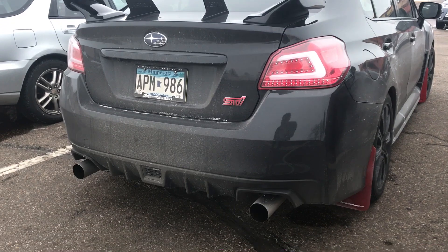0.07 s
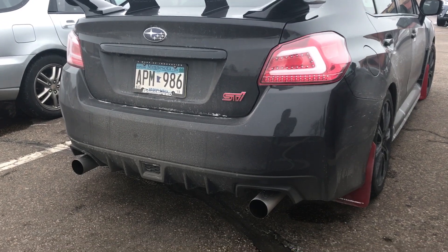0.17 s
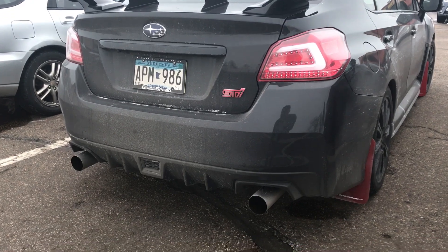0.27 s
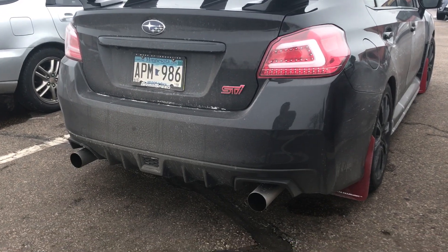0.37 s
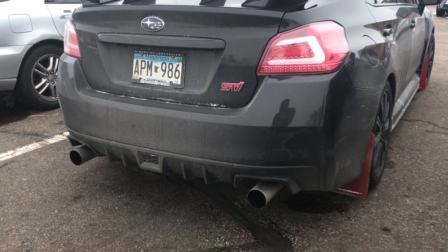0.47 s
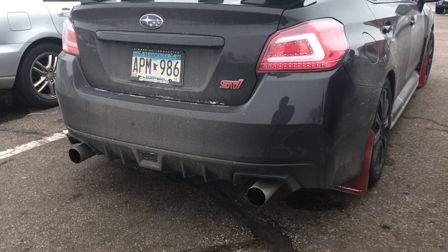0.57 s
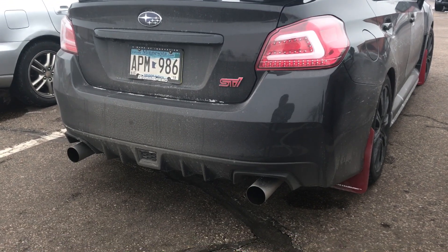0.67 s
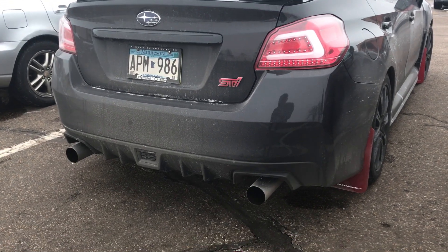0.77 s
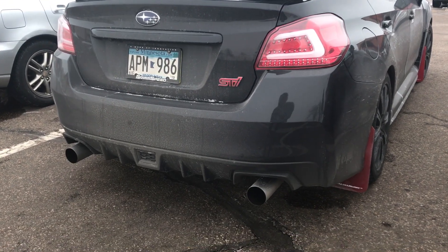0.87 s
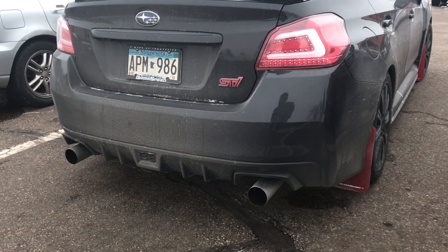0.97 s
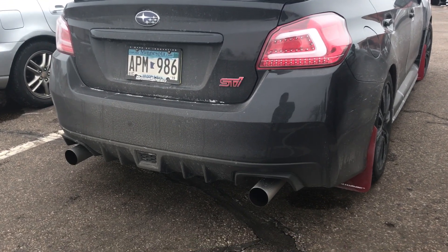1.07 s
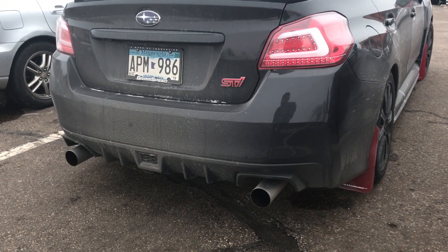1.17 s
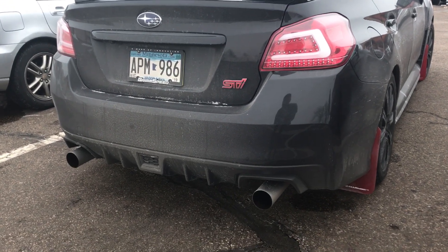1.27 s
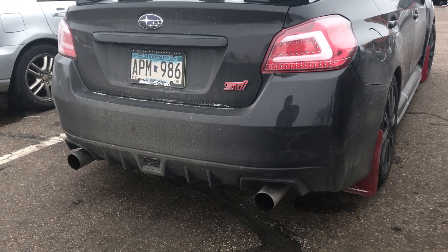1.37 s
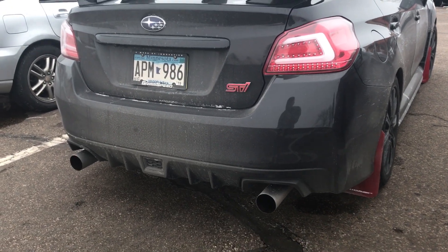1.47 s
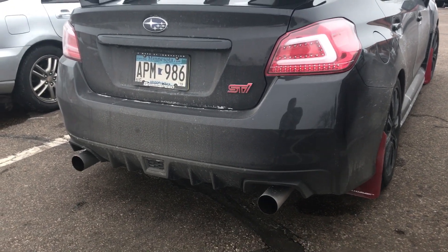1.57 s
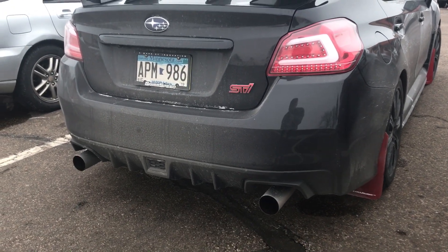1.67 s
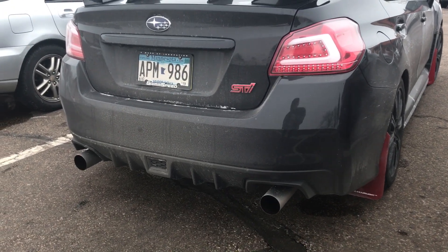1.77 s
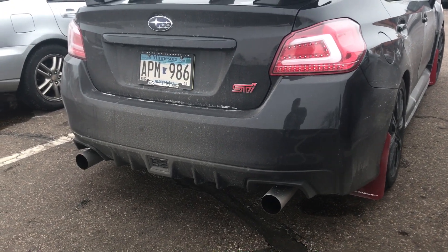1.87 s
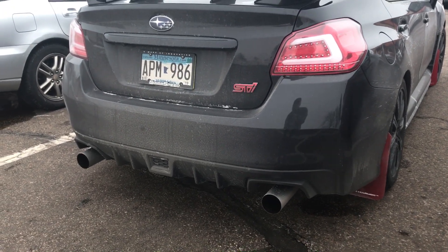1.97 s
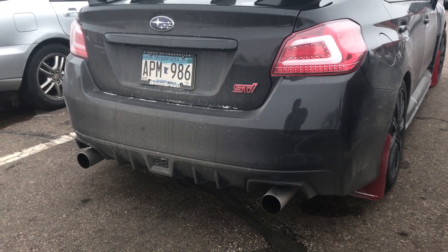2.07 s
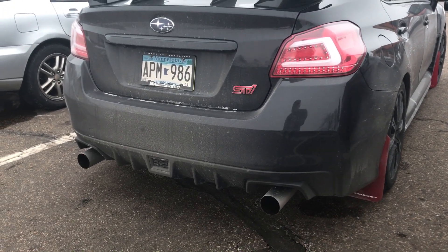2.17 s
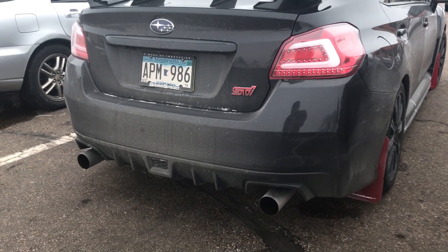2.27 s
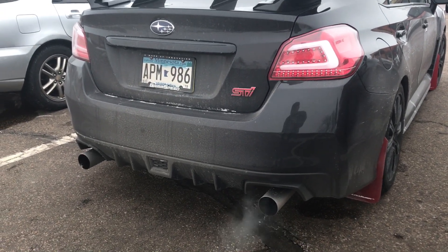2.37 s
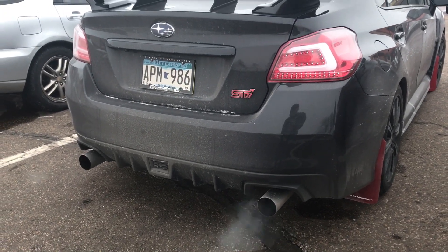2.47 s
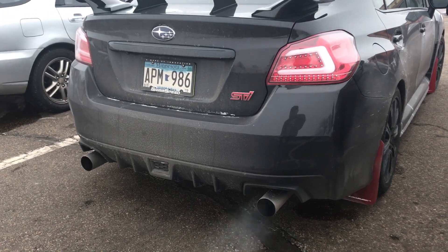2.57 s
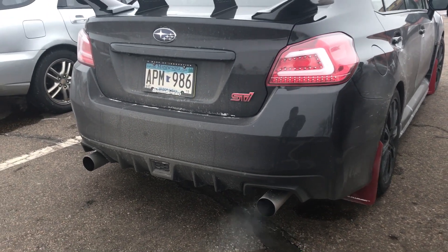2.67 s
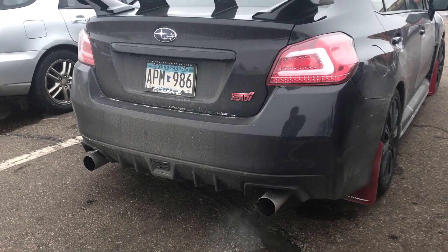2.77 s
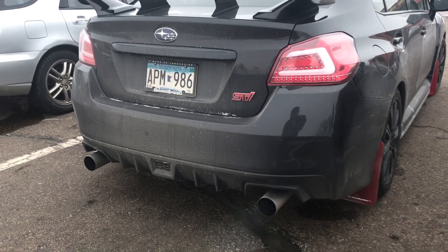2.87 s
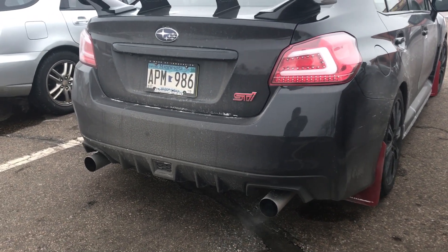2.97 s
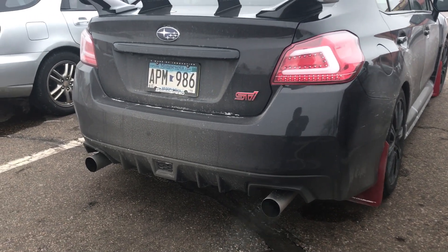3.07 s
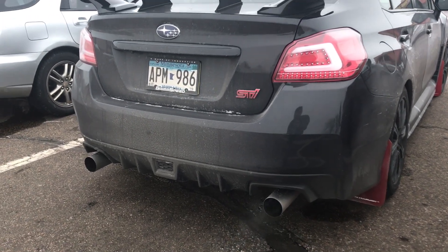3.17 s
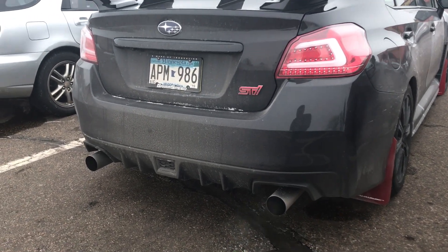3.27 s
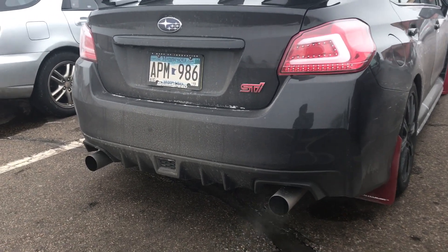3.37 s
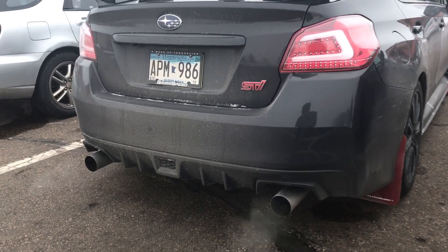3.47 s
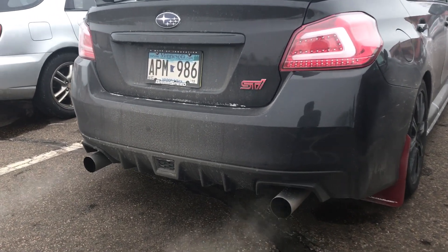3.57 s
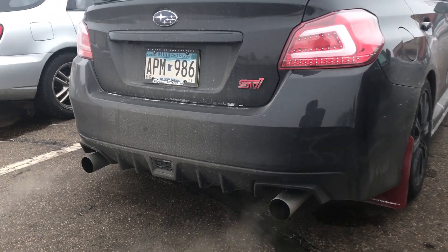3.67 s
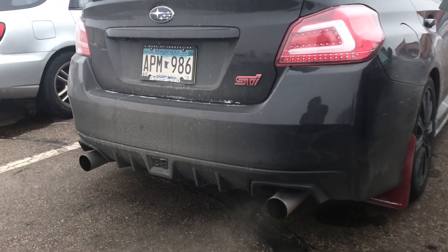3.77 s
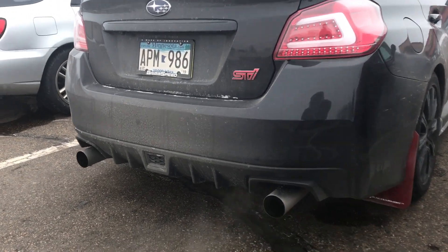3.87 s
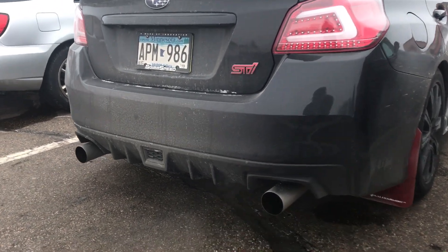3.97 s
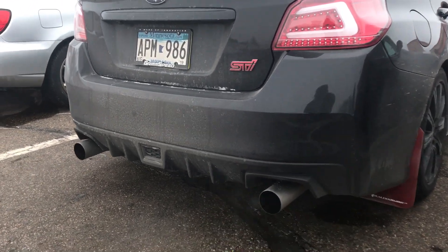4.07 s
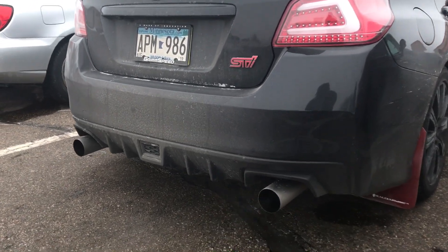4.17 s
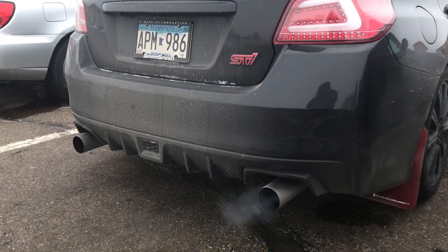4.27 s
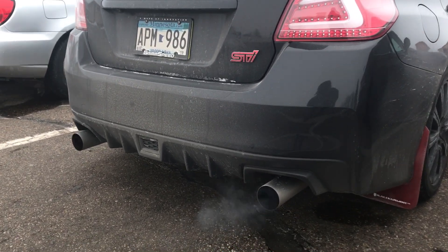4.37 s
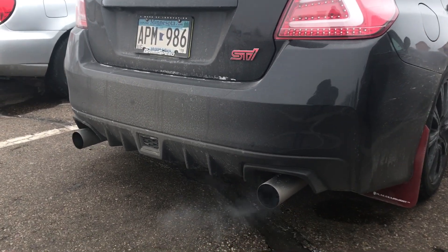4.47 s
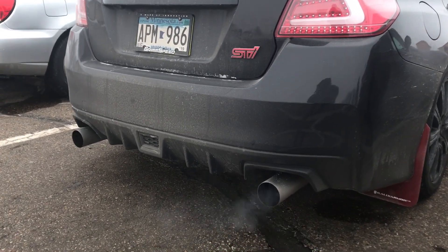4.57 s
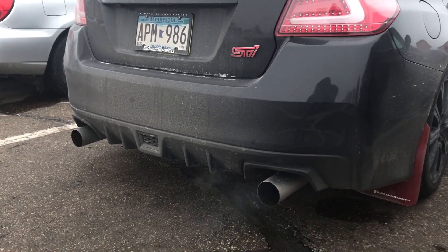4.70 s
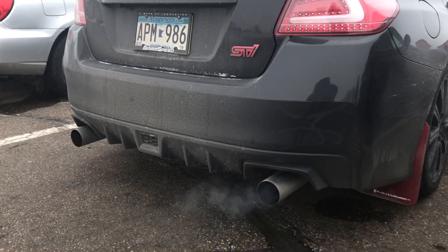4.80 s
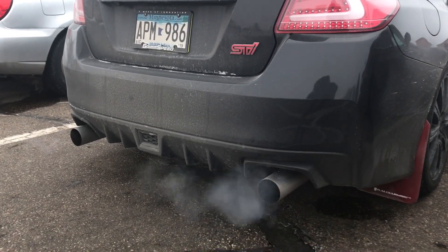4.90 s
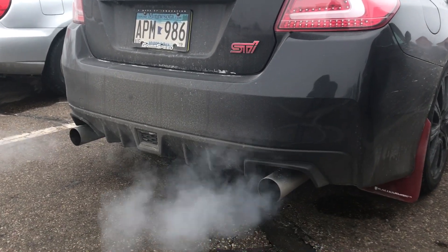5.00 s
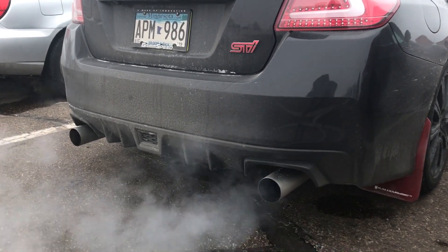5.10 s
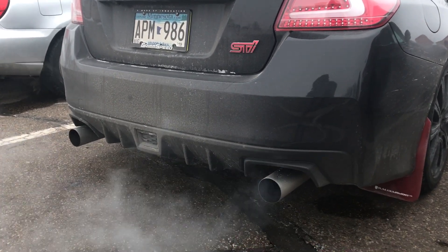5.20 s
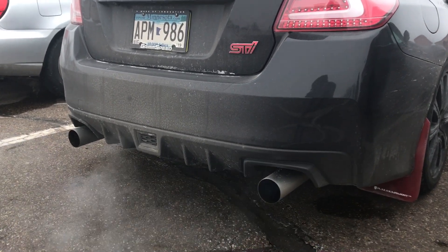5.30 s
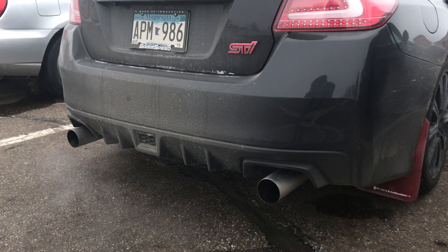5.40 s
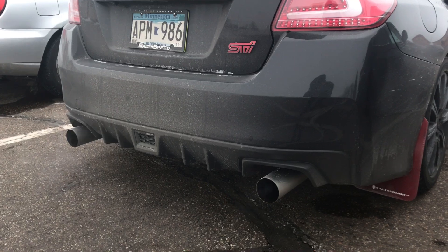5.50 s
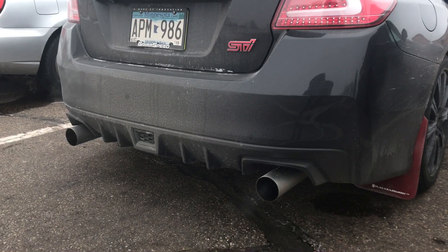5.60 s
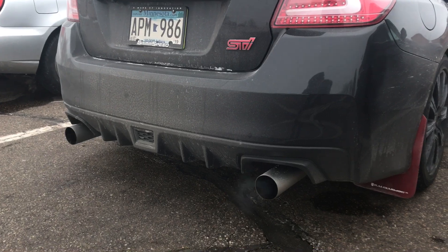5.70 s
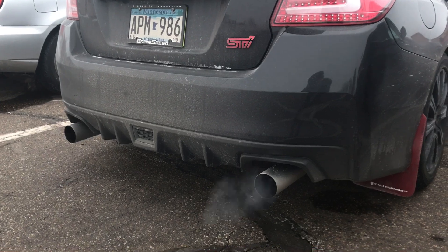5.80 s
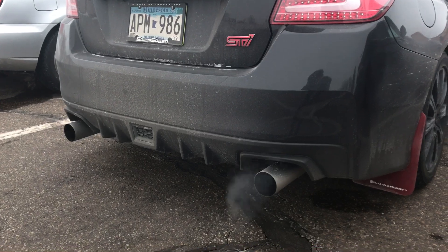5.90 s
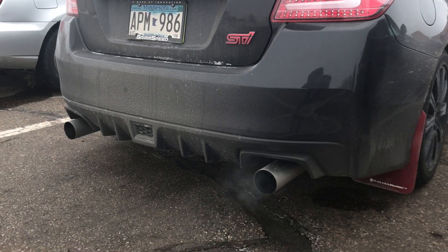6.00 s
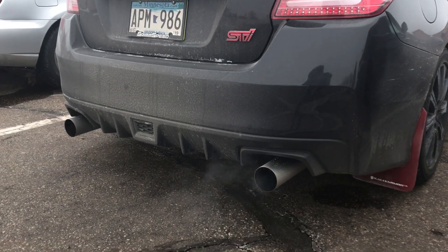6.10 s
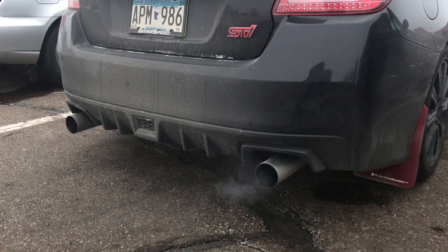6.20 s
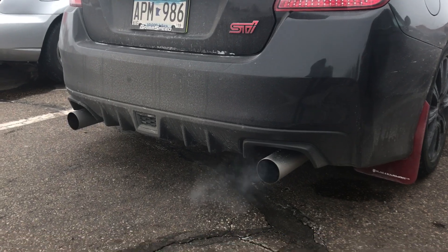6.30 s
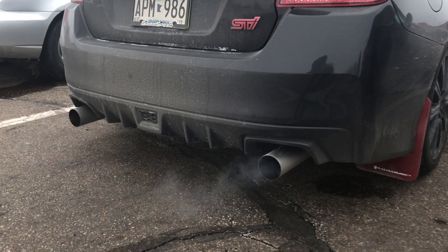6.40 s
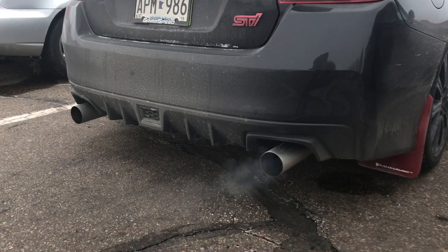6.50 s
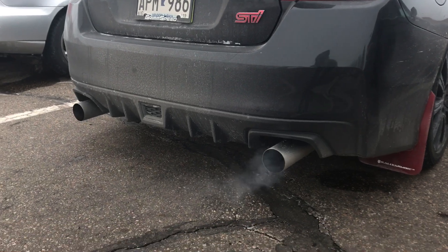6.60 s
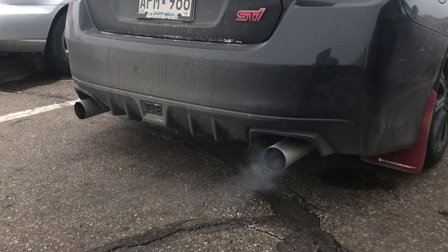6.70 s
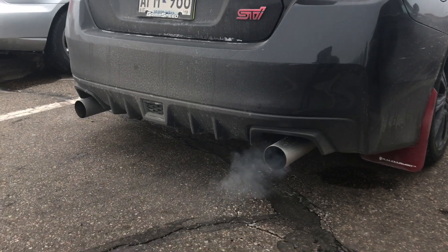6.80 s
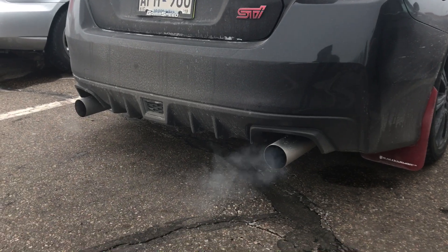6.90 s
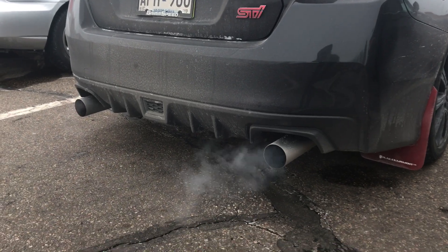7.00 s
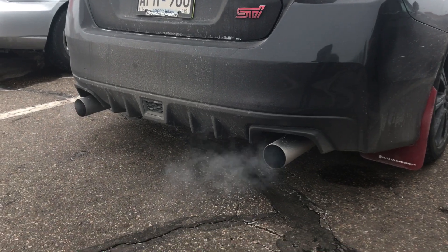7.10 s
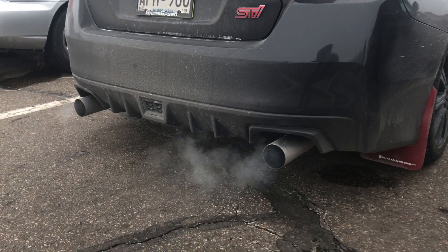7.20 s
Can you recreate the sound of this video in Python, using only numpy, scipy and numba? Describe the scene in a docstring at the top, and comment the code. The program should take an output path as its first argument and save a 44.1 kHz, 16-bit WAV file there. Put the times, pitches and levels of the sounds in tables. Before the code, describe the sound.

A phone held behind a parked car picks up its deep, off-beat four-cylinder exhaust. It idles briefly, then gets a soft rev, a stronger one, and two barking, rasping blips with popping in the pipe. The revs sag into burble after each, ending in a steady drone with small pops. Faint reflections from nearby cars, low outdoor rumble, light hiss and spits of air.

```python
"""A flat-four turbo car with an open exhaust idles and is blipped four times, two metres from a phone, outdoors.
Firing pulses ring the pipe; one bank's longer manifold delays and dulls its pair, so the note burbles.
Gas flow makes noise at the tips with each blip, and unburnt fuel pops in the pipe as bursts and blows.
Brief spits of air tick, electrics whine in thin tones, and parked cars reflect it over a low outdoor rumble."""
import sys
import numpy as np
from scipy import signal
from scipy.io import wavfile
from scipy.ndimage import uniform_filter1d
from numba import njit

SR = 44100
rng = np.random.default_rng(int(sys.argv[2]) if len(sys.argv) > 2 else 0)


def generate_wav(signal):
    """Clip the signal to [-1, 1] and save it as 16-bit WAV at the path in sys.argv[1]."""
    frames = np.transpose(np.atleast_2d(signal))
    scaled = np.clip(frames, -1, 1) * 32767
    pcm = np.round(scaled).astype(np.int16)
    wavfile.write(sys.argv[1], SR, pcm)


N = 319725
TIME = np.arange(N) / SR

# throttle blips: start_s, opening_s, closing_s, depth (0-1), burble_db (extra scatter after the blip)
BLIPS = [(.58, .09, .487, .386, 0), (2.169, .233, .443, .567, 2), (3.482, .179, .249, .897, 3),
         (4.924, .2, .228, 1, 3)]
# flywheel: gain in firing rate at full throttle, decay time of drag, resting and starting firing rates
PULL_HZ_PER_S, COAST_S, STALL_HZ, START_HZ = 278.2, 1.13, 22.48, 40.07
# extra throttle (0-1) at the early idle, and when it stops
IDLE_FEED, IDLE_FEED_ENDS_S = .0218, 2.0
# firing rates where the burble starts to fade in, is full, starts to fade out and is gone: rate_hz
BURBLE_HZ = [44, 48, 61, 66]
# scatter of firing strength: always, and added at full throttle
EVEN_DB, THROTTLE_SCATTER_DB = .8, .8
# mean firing strength of each cylinder, first and last on the long bank: strength_db (relative)
CYLINDER_DB = [1, -0.92, -0.46, 0.65]
# long manifold: delay, then a resonant low-pass and the share of sharp front that survives it
LONG_BANK_LAG_S = .0006
LONG_BANK_HZ, LONG_BANK_Q, LONG_BANK_LEAK = 132.4, 1.13, 0.35
# rush of exhaust gas in each blip: start_s, full_s, ease_s, end_s, strength (0-1)
RUSHES = [(0.644, 0.705, 0.79, 1.21, 0.43), (2.232, 2.384, 2.415, 2.675, 0.7),
          (3.466, 3.615, 3.67, 3.918, 0.8), (4.935, 5.05, 5.116, 5.36, 0.86)]
RUSH_BRIGHTENS = 0.28  # share by which rush strength 1 shifts the rasp to its near colour
# the phone sinks towards the near tip: time_s, nearness (0-1)
NEAR = [(0, 0.09), (2.6, 0.15), (3.6, 0.46), (4.6, 0.72), (6.4, 0.96), (7.25, 0.58)]
# level against firing rate, throttle shut: rate_hz, boom_db, bark_db, rasp_db, roar_db, hiss_db (relative)
COASTING = [(36, -16, -14, -20.5, -43, -60.5), (41.6, -20, -19, -22.5, -47, -59.5),
            (48.2, -17.5, -18.5, -26, -48, -59.5), (70, -16, -19, -26.5, -48, -59.5),
            (72.2, -18, -21.5, -24, -47.5, -59.5), (97, -25.5, -19.5, -26.5, -45.5, -58.5)]
# responses of boom, bark, rasp, roar, hiss in turn: lead_s, full_rush_db, curve_power, swell_db,
# burble_slope (dB per dB of extra scatter), near_db (at nearness 1)
RESPONSE = [(0, 5.5, 1.4, 4, -0.9, 0.5), (0.017, 12.5, 0.63, 6.5, -0.87, -0.5),
            (0.018, 19.5, 0.95, 8, -.5, -4), (0.0092, 23, 1, 5.5, 0, -1), (0.0073, 17, 1.74, 2, -1, -2)]
# brief swells of the note: centre_s, strength (0-1)
SWELLS = [(3.0, 0.13), (3.99, 0.74), (5.46, 1)]
SWELL_S = 0.12  # time from the centre to 1/e
# low and middle pipe resonances: centre_hz, width_hz (first pass), gain_db (relative)
BOOM = [(45.8, 26, 2.5), (67, 31.2, 7)]
BARK = [(104.6, 13.2, -0.88), (127.4, 12.7, -0.38), (147.2, 13.6, 1), (174.26, 23, 1)]
# upper pipe resonances heard far from and near the tip: centre_hz, width_hz (first pass), gain_db (relative)
RASP_FAR = [(227.5, 34.4, -5), (264, 31, 1), (297.7, 29, -0.5)]
RASP_NEAR = [(257.4, 15.3, -3.5), (297.8, 23, 6), (328.8, 36.6, -3.5), (376.2, 35, -7)]
# high pipe modes excited by flow, far and near: centre_hz, width_hz (first pass), gain_db (relative)
ROAR_FAR = [(499, 47, 0), (621, 58, -13.5), (849, 49, 3), (1060, 230, -10.5), (1422, 210, -11)]
ROAR_NEAR = [(490, 44.5, 0.5), (605, 47, -1.5), (820, 140, -8.5), (1122, 122, -10.5), (1320, 144, -8.5)]
# spectrum of the flow hiss: frequency_hz, density_db (relative, per Hz)
AIR = [(820, -31), (1400, 2), (1700, 0), (2340, -2), (3100, -3.5), (3720, -5.5), (4400, -7.5),
       (4930, -20.5), (5900, -11.5), (10200, -23), (12000, -33.5), (12300, -21), (15600, -20)]
HISS_FLICKER_DB = .7
# tones of the electrics: mean_hz, level_db (rms, before the common level below)
WHINE = [(11510, -75), (12360, -86), (12877, -88), (13410, -88), (15127, -87)]
# common level of those tones: time_s, change_db
WHINE_LEVEL = [(0, 7), (2.3, 4), (2.7, -1), (4.4, 2), (5.8, -13), (6.3, 4), (7.25, 4)]
# afterfire in the pipe: start_s, crack_db (before CRACK_DB is added), thump_db (relative)
POPS = [(0.372, -40, -32), (0.396, -43, -16), (0.506, -45, -27), (0.685, -46, -30), (2.261, -51, -12),
        (2.385, -28, -2), (2.424, -29, -10), (2.547, -30, -17), (2.602, -33, -24), (2.959, -52, -8),
        (3.02, -37, -10), (3.158, -38, -7.5), (3.584, -28, -3), (3.619, -18, -34), (3.649, -13, -1),
        (3.693, -25.5, -18), (4.374, -37, -13), (4.521, -30.5, -6.5), (5.018, -22, 1.5), (5.047, -21, -21),
        (5.114, -14.5, 2), (5.189, -44, -0.5), (5.362, -31, -7.5), (5.964, -35.5, -31), (6.118, -40, -20),
        (6.23, -36.5, -10.5), (6.259, -35, -17), (6.321, -37, -18), (6.351, -31.5, -32),
        (6.366, -31.5, -13.5)]
CRACK_S, CRACK_DB = 0.0037, -4  # time to the burst's peak, level added to every crack
# spits of air: start_s, strength_db (relative)
TICKS = [(2.938, -58.5), (2.9989, -46), (3.0627, -40), (3.1296, -39.5), (3.198, -38), (3.2693, -39),
         (3.3406, -43.5), (3.4509, -45), (4.2256, -46), (4.5055, -47), (5.0203, -37), (5.9876, -48),
         (6.0726, -43), (6.1462, -40)]
TOP_HZ = 15720  # upper band edge of the phone


def undb(db):
    """Amplitude gain is ten to the power of decibels over twenty."""
    return 10 ** (np.asarray(db) / 20)


def level(x, db):
    """Normalisation by the root mean square sets the effective level."""
    return x * undb(db) / np.sqrt(np.mean(x ** 2))


def curves(table):
    """Linear interpolation joins table columns in time."""
    s, *columns = np.transpose(table)
    return [np.interp(TIME, s, c) for c in columns]


@njit
def svf(x, hz, width):
    """Two coupled integrators form a band-pass resonator with unit gain at its centre."""
    y, band, low = np.empty(len(x)), 0., 0.
    g, damping = np.tan(np.pi * hz / SR), width / hz
    for i in range(len(x)):
        v = (band + g * (x[i] - low)) / (1 + g * (g + damping))
        band, low, y[i] = 2 * v - band, low + 2 * g * v, damping * v
    return y


def ring(x, modes, skirt=1.8):
    """Modal superposition: resonances of alternating sign, steepened by a second pass of scaled width."""
    total = 0
    for k, (hz, width, db) in enumerate(modes):
        first = svf(x, 1. * hz, 1. * width)
        total = total + (-1) ** k * undb(db) * svf(first, 1. * hz, skirt * width)
    return total


def walk(rate):
    """Held random values, averaged twice, give a slow fluctuation of spread near 1."""
    k = int(SR / rate)
    held = np.repeat(rng.standard_normal(N // k + 1), k)
    return 1.3 * uniform_filter1d(uniform_filter1d(held, k), k)[:N]


def impulses(seconds, size):
    """An ideal impulse concentrates each event in one sample."""
    return np.bincount(np.clip(seconds * SR, 0, N - 1).astype(int), size, N)


def coloured(points, flicker_db):
    """Band synthesis: independently flickering bands of noise follow a power spectrum."""
    hz, db = np.transpose(points)
    centres = np.geomspace(hz[1], hz[-2], num=18)
    # bandwidth grows with frequency, so density per Hz is converted to band level
    gains = np.interp(np.log(centres), np.log(hz), db) + 10 * np.log10(centres / 2000)
    total = 0
    for f, gain in zip(centres, gains):
        band = svf(svf(rng.standard_normal(N), f, f / 5), f, f / 5)
        total = total + undb(gain + flicker_db * walk(15)) * band
    return total


def throttle():
    """Piecewise-linear control: each blip opens and closes in straight ramps."""
    return sum(depth * np.interp(TIME, [s, s + up, s + up + down], [0, 1, 0])
               for s, up, down, depth, _ in BLIPS)


def speed():
    """Flywheel dynamics: throttle torque raises the firing rate and drag relaxes it exponentially."""
    pull = PULL_HZ_PER_S * (throttle() + IDLE_FEED * (TIME < IDLE_FEED_ENDS_S))
    coast = STALL_HZ + (START_HZ - STALL_HZ) * np.exp(-TIME / COAST_S)
    return coast + signal.lfilter([1 / SR], [1, 1 / (SR * COAST_S) - 1], pull)


def burble(hz):
    """Irregular combustion: burns scatter more, in dB, while coasting through a band of speeds."""
    s, *_, db = np.transpose(BLIPS)
    latest = np.clip(np.searchsorted(s, TIME) - 1, 0, None)
    shut = uniform_filter1d(1. * (throttle() == 0), size=2048)
    return db[latest] * shut * np.interp(hz, BURBLE_HZ, [0, 1, 1, 0])


def rush(lead_s):
    """Gas flow in each blip follows a ramp up, a hold and a ramp down, advanced by lead_s."""
    return sum(a * np.interp(TIME + lead_s, times, [0, 1, 1, 0]) for *times, a in RUSHES)


def loudness(hz, burble_db):
    """Decibel gains add: boom, bark, rasp, roar and hiss follow speed, flow, swells, burble and nearness."""
    near, = curves(NEAR)
    swell = sum(a * np.exp(-((TIME - s) / SWELL_S) ** 2) for s, a in SWELLS)
    rate, *shut_db = np.transpose(COASTING)
    levels = []
    for db, (lead_s, full_db, power, swell_db, slope, near_db) in zip(shut_db, RESPONSE):
        flow_db = np.interp(hz, rate, db) + full_db * rush(lead_s) ** power
        levels.append(flow_db + swell_db * swell + slope * burble_db + near_db * near)
    return levels


def firings(hz, uneven_db):
    """Phase accumulation times pressure pulses, two per bank in turn, each followed by a decaying gas puff."""
    turns = np.cumsum(hz) / SR - .9
    index = np.arange(-1, int(turns[-1]) + 1)
    chance = rng.standard_normal((1000, 2))[:len(index)].T
    at = np.interp(index, turns, TIME)
    scatter_db = np.interp(at, TIME, uneven_db)
    at = at + .0001 * scatter_db * chance[0]  # uneven burns also come early or late
    size = undb(np.take(CYLINDER_DB, index % 4) + scatter_db * chance[1])
    far = (index + 1) % 4 < 2
    short = impulses(at[~far], size[~far])
    late = impulses(at[far] + LONG_BANK_LAG_S, size[far])
    # the crossover pipe is a resonant low-pass on its two cylinders; a little of the sharp front survives
    w = 2 * np.pi * LONG_BANK_HZ
    dull = signal.lfilter(*signal.bilinear([w * w], [1, w / LONG_BANK_Q, w * w], SR), late)
    puff = np.convolve(short + 0.71 * late, np.exp(-TIME[:1024] / 0.013))[:N]
    return short + dull + LONG_BANK_LEAK * (late - dull), puff


def exhaust(pulses, boom_db, bark_db, rasp_db):
    """Forced resonance: firings, roughened by turbulence, ring the low, middle and upper pipe modes."""
    near = np.clip(curves(NEAR)[0] + RUSH_BRIGHTENS * rush(0), 0, 1)
    drive = level(pulses, 0) + level(rng.standard_normal(N), -18)
    rasp_far = level(ring(drive, RASP_FAR, skirt=0.72), 0)
    rasp_near = level(ring(drive, RASP_NEAR, skirt=0.89), 0)
    rasp = (1 - near) * rasp_far + near * rasp_near
    boom = level(ring(drive, BOOM), 0)
    bark = level(ring(drive, BARK), 0)
    return undb(boom_db) * boom + undb(bark_db) * bark + undb(rasp_db) * rasp


def gas(puff, roar_db, hiss_db):
    """Turbulent flow, modulated by puffs, excites high pipe modes and radiates a broad hiss and a bright jet."""
    near, = curves(NEAR)
    flow = (0.27 + puff) * rng.standard_normal(N)
    roar = (1 - near) * ring(flow, ROAR_FAR, skirt=7.8) + near * ring(flow, ROAR_NEAR, skirt=7.2)
    roar = roar * undb(0.3 * walk(15))
    hiss = (1.7 + puff) * coloured(AIR, flicker_db=HISS_FLICKER_DB) * undb(0.74 * walk(18))
    jet = (.8 + puff) * svf(rng.standard_normal(N), 13500., 7000.)
    jet_db = -63.5 + 1.4 * (hiss_db + 57)  # the jet grows faster than the hiss when the throttle opens
    return undb(roar_db) * level(roar, -0.74) + undb(hiss_db) * level(hiss, 6.3) + undb(jet_db) * level(jet, 0)


def whine():
    """Slow random frequency and amplitude modulation makes the electrics' thin sinusoids unsteady."""
    db_now, = curves(WHINE_LEVEL)
    waver_db = 1.5
    total = 0
    for hz, db in WHINE:
        gain = np.sqrt(2) * undb(db + db_now + waver_db * walk(1.4))
        phase = 2 * np.pi * np.cumsum(hz + 14 * walk(30)) / SR
        total = total + gain * np.sin(phase)
    return total


def rumble():
    """Band-limited noise forms the low outdoor rumble."""
    return level(svf(rng.standard_normal(N), 25., 67.0), -43)


def afterfire():
    """Impulsive excitation: each pop is a rough noise burst and a blow that rings the pipe."""
    s, crack_db, thump_db = np.transpose(POPS)
    near, = curves(NEAR)
    modes = [(hz, 2 * w, db) for hz, w, db in ROAR_NEAR] + [(2560, 1200, -29.0)]
    noise = rng.standard_normal(N)
    shape = TIME[:4096] / CRACK_S * np.exp(1 - TIME[:4096] / CRACK_S)
    bursts = signal.fftconvolve(impulses(s, undb(crack_db)), shape)[:N]
    cracks = ring(bursts * noise, modes) * undb(CRACK_DB) / ring(noise, modes).std()
    blows = [ring(np.eye(1, 4096)[0], rasp + BARK[2:]) for rasp in (RASP_FAR, RASP_NEAR)]
    thumps = [signal.fftconvolve(impulses(s, undb(thump_db)), blow / blow.max())[:N] for blow in blows]
    return cracks + (1 - near) * thumps[0] + near * thumps[1]


def ticks():
    """Amplitude modulation of bright noise by millisecond envelopes makes the spits of air."""
    s, db = np.transpose(TICKS)
    shape = TIME[:1024] / 0.0098 * np.exp(1 - TIME[:1024] / 0.0021)
    envelope = np.convolve(impulses(s, undb(db)), shape)[:N]
    return undb(6.5) * envelope * level(svf(rng.standard_normal(N), 4500.0, 14000.), 0)


def slap_back(car):
    """Specular reflection: three delayed, weakened copies return off the parked cars."""
    echoes = impulses(np.array([.011, .023, .041]), undb([-20, -23, -26]))[:4096]
    return signal.fftconvolve(car, echoes)[:N]


def scene():
    """Linear superposition sums the car, its reflections, the whine and the rumble."""
    hz = speed()
    burble_db = burble(hz)
    boom_db, bark_db, rasp_db, roar_db, hiss_db = loudness(hz, burble_db)
    pulses, puff = firings(hz, EVEN_DB + THROTTLE_SCATTER_DB * throttle() + burble_db)
    car = exhaust(pulses, boom_db, bark_db, rasp_db) + gas(puff, roar_db, hiss_db) + afterfire() + ticks()
    return (car + slap_back(car) + whine() + rumble())[None]


def record(dry):
    """Band limiting and saturation: the phone cuts deep bass, rounds the loudest peaks and cuts the top."""
    x = signal.sosfilt(signal.butter(N=1, Wn=30, btype="high", fs=SR, output="sos"), dry)
    x = x / (1 + np.abs(x) ** 10) ** (1 / 10)
    return signal.sosfilt(signal.ellip(14, .2, 80, TOP_HZ, fs=SR, output="sos"), x)


dry = scene()
out = record(dry)
generate_wav(out)
```